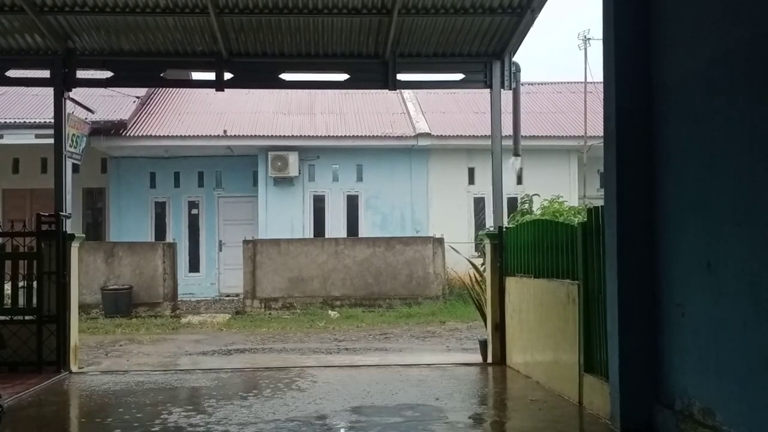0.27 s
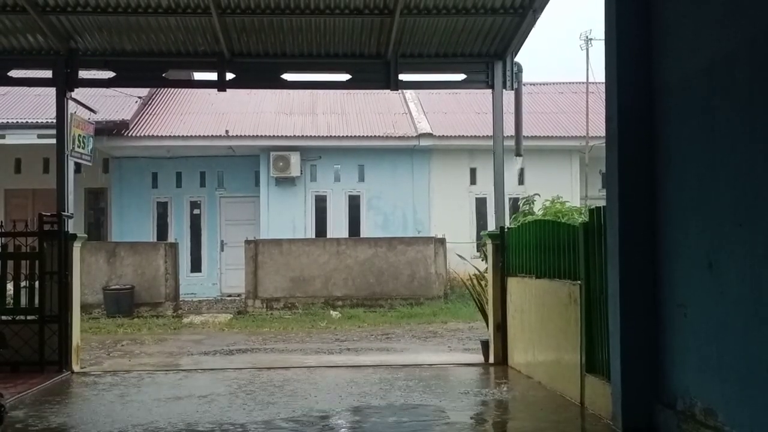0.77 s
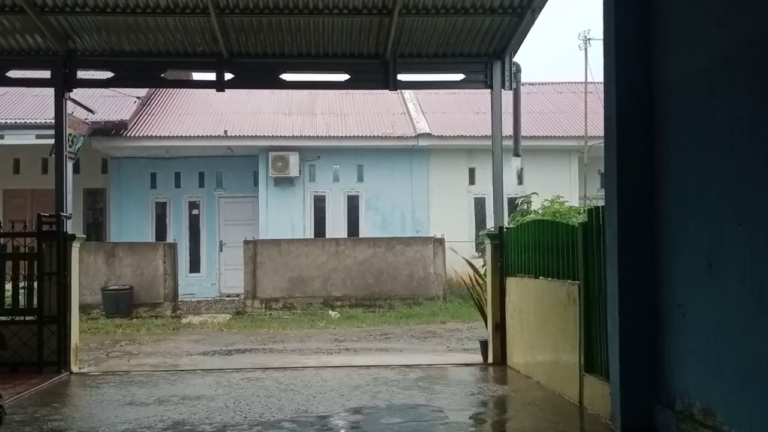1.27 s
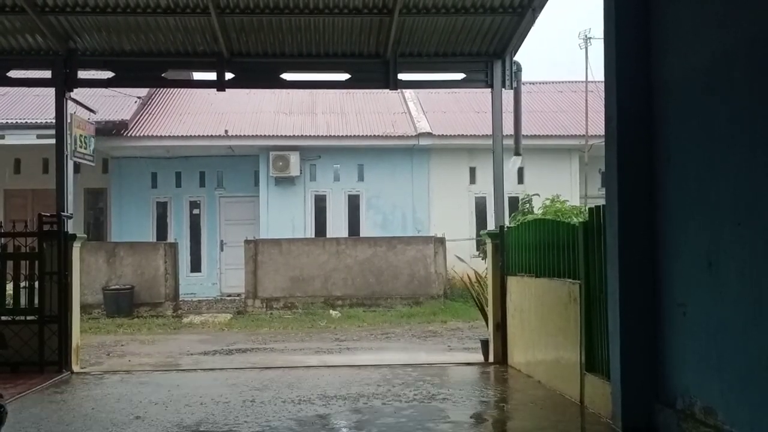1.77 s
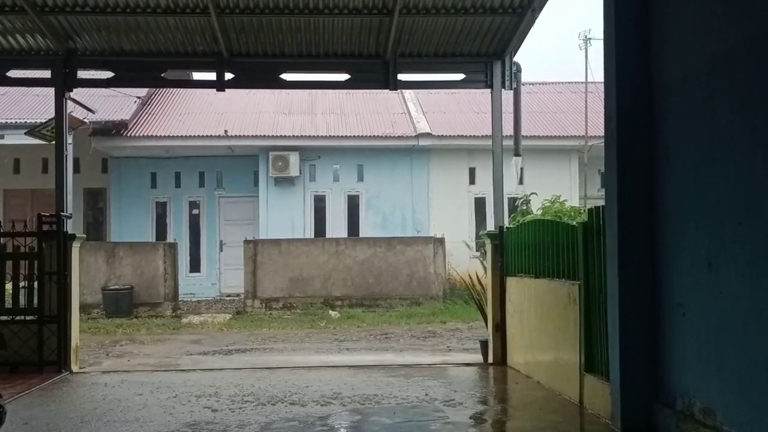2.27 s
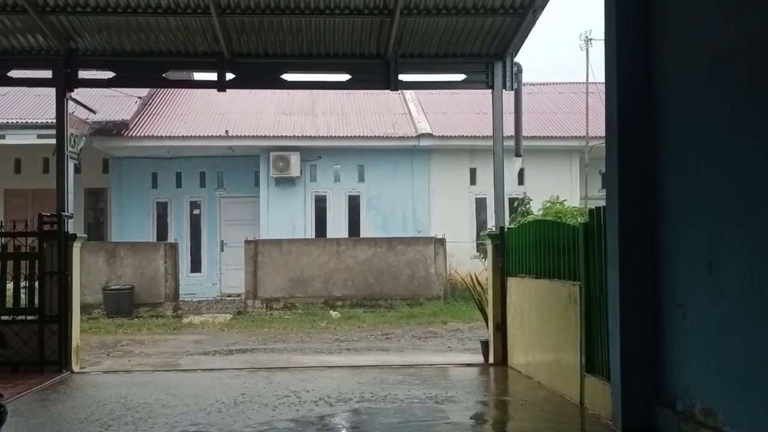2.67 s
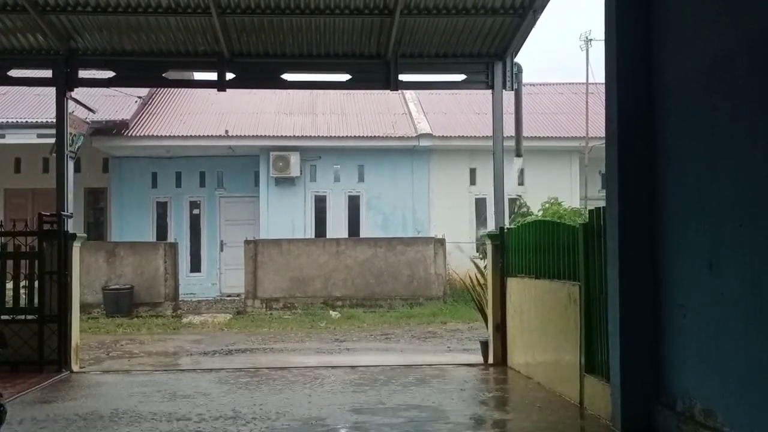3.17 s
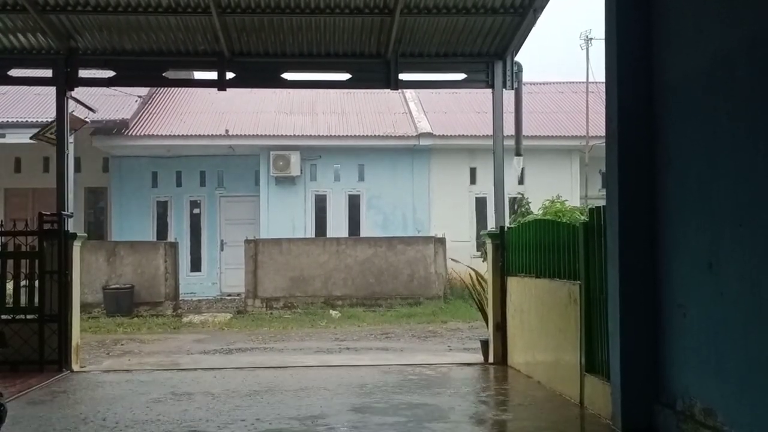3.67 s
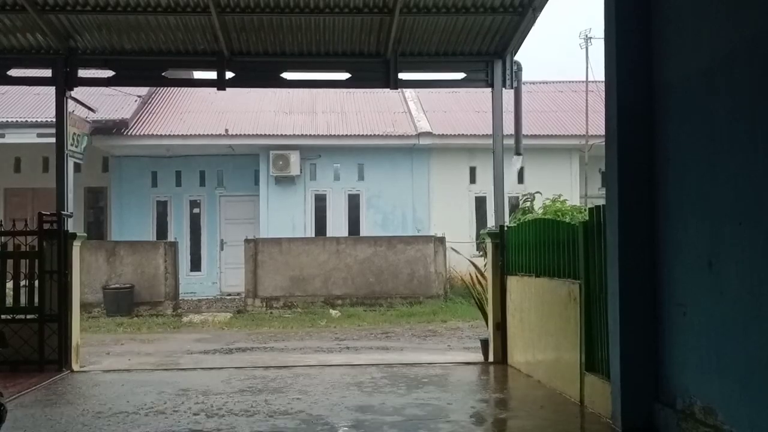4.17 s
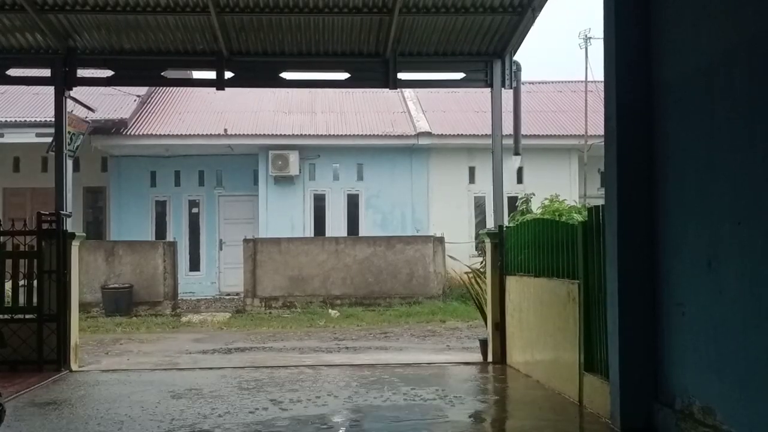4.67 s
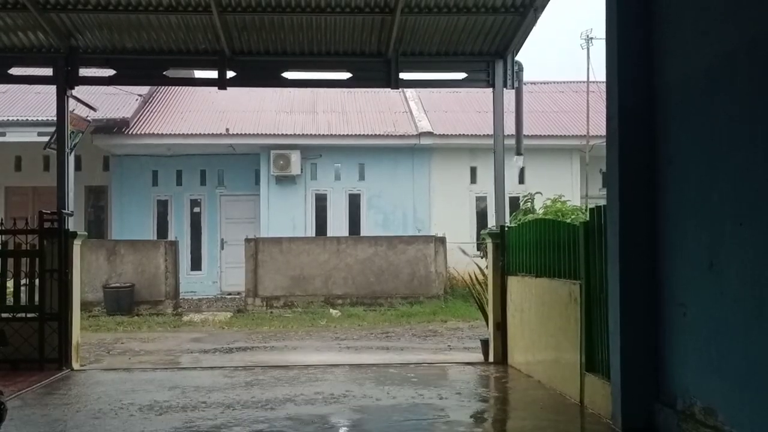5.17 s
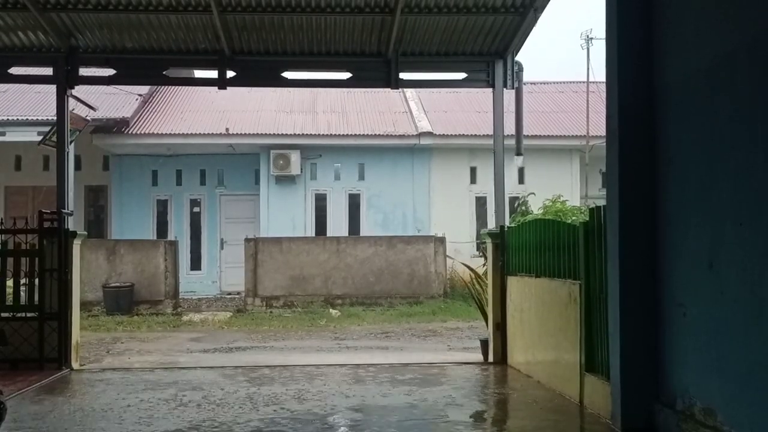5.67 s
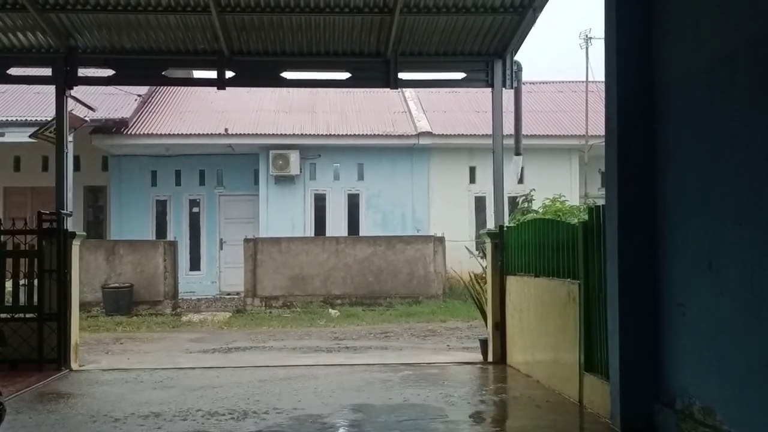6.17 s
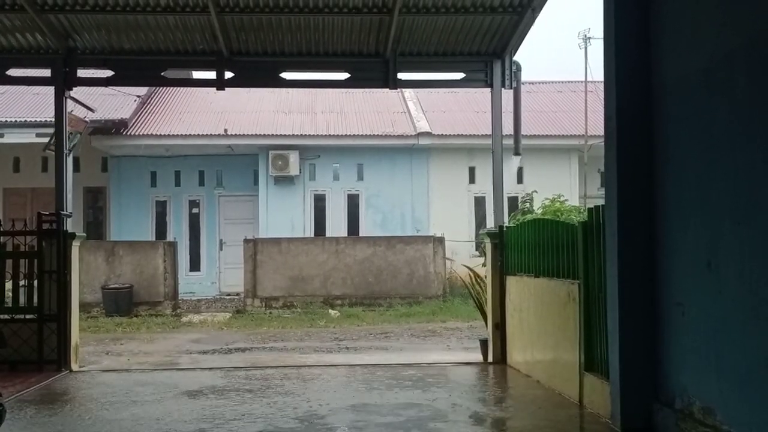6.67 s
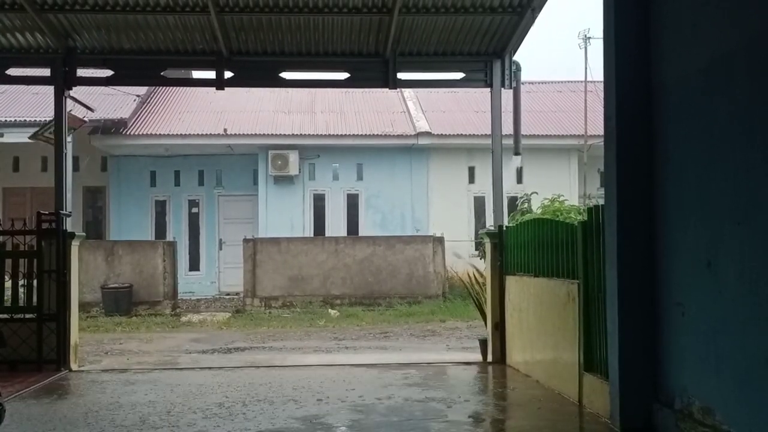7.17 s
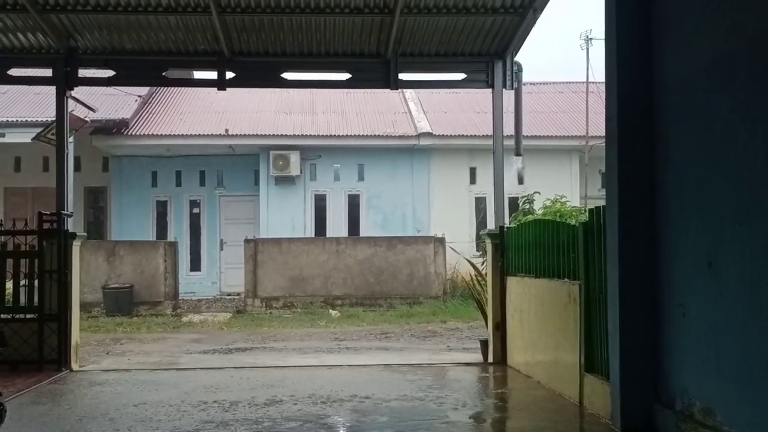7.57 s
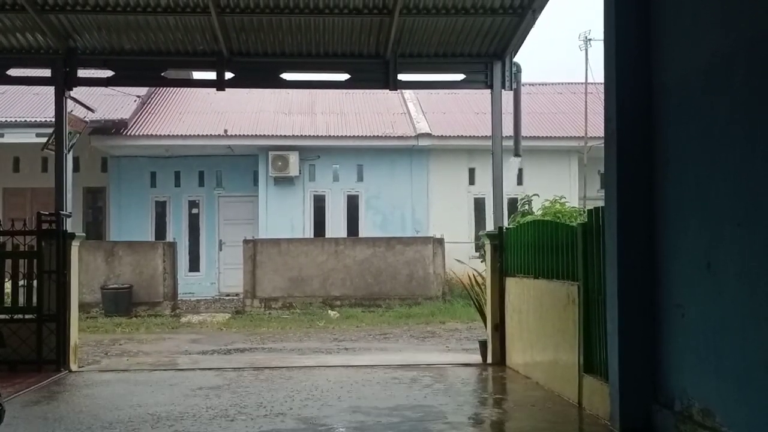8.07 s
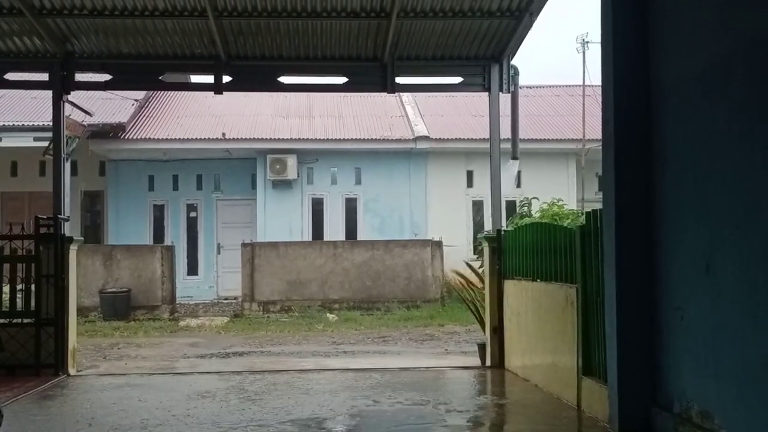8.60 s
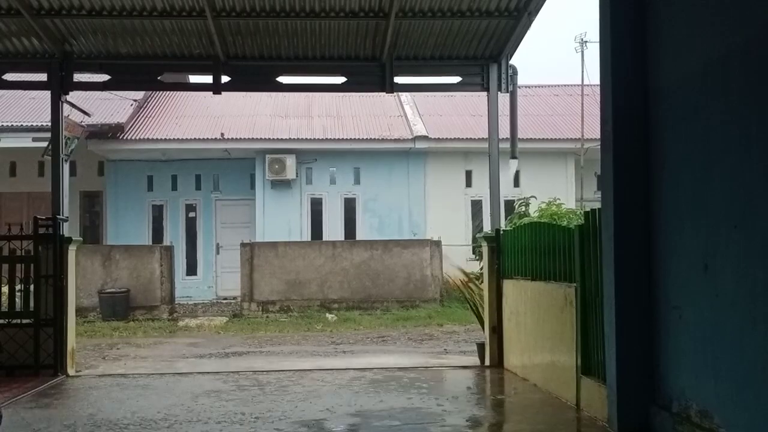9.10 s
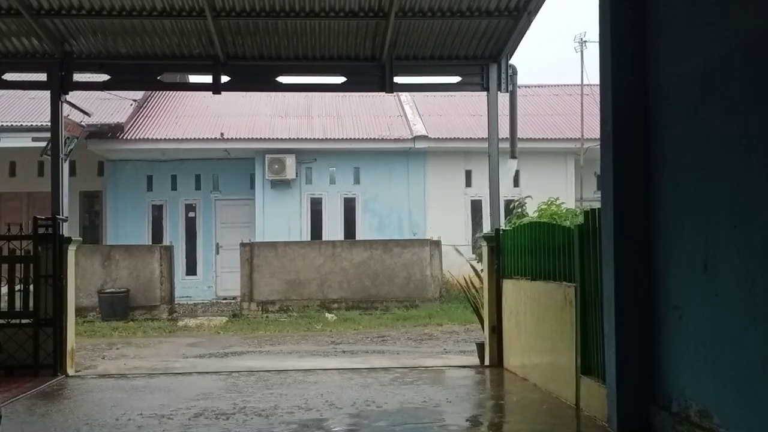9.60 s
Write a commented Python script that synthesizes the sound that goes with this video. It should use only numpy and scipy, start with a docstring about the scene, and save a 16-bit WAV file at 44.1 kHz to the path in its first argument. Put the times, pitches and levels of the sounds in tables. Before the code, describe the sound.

A heavy downpour is already roaring at the start and continues without pause for nearly ten seconds, heard in mono from beneath a corrugated metal carport. Dense hard ticks on thin metal, brightest near 3 kHz, merge with a fine sizzle of spray and a smoother, duller rush from distant roofs. Underneath, panels drum dully and the roof span booms softly around 100 Hz, swaying irregularly. Gusts brighten and lift the roar at about 0, 0.7 and 1.6 seconds, then 3.1 to 3.5 and 4.4 to 4.8. The biggest surge crests near 5.7 and falls away gradually; milder swells follow around 7.1, 8.1, 8.9 and 9.5. The boom is fuller early and thinner after 6 seconds, recovering toward the end. Single fat drops crack close by with short, tight echoes near 1.2, 2.5, 3.8, 4.3, 5.3, 5.9, 6.1, 7.3 and 9.6. The rain is still pouring at the end.

```python
"""A bright roar of rain at the crest of a gust: a downpour on corrugated metal roofs, in mono from under a carport.
Thousands of random clicks a second, coloured by filters, make the patter, the panels' drumming and the spray.
Filtered noise makes the smooth rush of far roofs and, through resonators, the boom of the roof span.
Gusts throw sheets of rain over the roofs, so that the roar swells and brightens.
Now and then a fat drop ticks out of the wash and echoes under the carport."""
import sys
import numpy as np
from scipy import signal
from scipy.fft import rfft, irfft, next_fast_len
from scipy.io import wavfile

SR = 44100
rng = np.random.default_rng(int(sys.argv[2]) if len(sys.argv) > 2 else 0)


def log_audio(samples):
    """Write samples as a 16-bit WAV file to the path given in sys.argv[1]."""
    # one column per channel
    frames = np.atleast_2d(samples).T
    # limit to full scale, then quantise
    limited = np.clip(frames, -1, 1)
    pcm = np.round(limited * 32767).astype(np.int16)
    wavfile.write(sys.argv[1], SR, pcm)


N = 433944


def from_db(db):
    """Decibels to gain."""
    return 10 ** (np.asarray(db) / 20)


def rms_one(x):
    """Scale to rms 1."""
    return x / np.sqrt(np.mean(x ** 2) + 1e-20)


def level_curve(table):
    """Draw straight lines through a table of times and levels, one value per sample."""
    times_s, levels_db = np.transpose(table)
    return np.interp(np.arange(N) / SR, times_s, levels_db)


def band(x, low_hz, high_hz, order=4):
    """Butterworth band-pass."""
    sections = signal.butter(order, [low_hz, high_hz], "band", fs=SR, output="sos")
    return signal.sosfilt(sections, x)


def coloured(x, spectrum):
    """Causal (minimum-phase) filter of a given spectrum: each click becomes a short ring."""
    size = 2 * next_fast_len(N // 2 + SR // 4)
    hz, db = np.transpose(spectrum)
    bins_hz = np.maximum(np.arange(size // 2 + 1) * SR / size, 1)
    gain = from_db(np.interp(np.log(bins_hz), np.log(hz), db))
    # folding the cepstrum onto positive times puts the energy as early as it can be
    cepstrum = irfft(np.log(gain))
    cepstrum[1:size // 2] *= 2
    cepstrum[size // 2 + 1:] = 0
    response = np.exp(rfft(cepstrum))
    return irfft(rfft(x, size) * response)[:N]


def drift(rate_hz):
    """Slow random wander of rms 1: noise through two equal one-pole low-passes."""
    step = 100   # samples between the points of the wander
    r = np.exp(-2 * np.pi * rate_hz * step / SR)
    noise = rng.standard_normal(2 * (N // step))
    slow = signal.lfilter([1], [1, -2 * r, r * r], noise)[N // step:]   # the first half settles the filter
    return np.interp(np.arange(N) / step, np.arange(len(slow)), rms_one(slow))


def drops(per_s, level_db, spread_db):
    """Random impacts of uneven size and even overall power; the harder it rains, the more of them land."""
    flow = from_db(level_db - np.mean(level_db)) ** 2
    chance = per_s * flow / SR
    landed = rng.random(N) < chance
    sizes = from_db(spread_db * np.minimum(rng.exponential(1, N), 4)) * rng.choice([-1, 1], N)
    # dividing by the density leaves the loudness to the layer's own level
    return rms_one(landed * sizes / np.sqrt(np.minimum(chance, 1)))


GUST_FALL = 1.77   # a gust takes this many times longer to die away than to rise
FLURRY_DB, FLURRY_HZ = 0.16, 9.9   # small random surges: depth and rate
# Gusts throwing sheets of rain over the roofs; each layer takes its own share of the swell.
# Each row: crest in seconds, swell in dB, rise time in seconds (from 1/e of the swell to the crest).
GUST_CRESTS = [(0, 3.5, .24), (.66, 5.5, .19), (1.63, 5, .56), (3.06, 3.5, .23), (3.5, 4.5, .44),
               (4.429, 3.5, .17), (4.77, 3.5, .11), (5.749, 9, .39), (6.43, 2.5, .16), (7.1, 3.5, .42),
               (8.1, 3, .24), (8.89, 3.5, .18), (9.52, 3, .25)]


def gust_swell():
    """Rain intensity in dB: each gust rises quickly and dies away more slowly, with flurries on top."""
    t = np.arange(N) / SR
    swell_db = FLURRY_DB * drift(FLURRY_HZ)
    for crest_s, db, rise_s in GUST_CRESTS:
        width_s = np.where(t < crest_s, rise_s, rise_s * GUST_FALL)
        swell_db = swell_db + db * np.exp(-((t - crest_s) / width_s) ** 2)
    return swell_db


# base level in dB, share of the gusts' swell, share of the low end's slow level
PATTER_DB, PATTER_GUST, PATTER_LOW = -24.5, .9, .15
# Colour of a tick on thin metal, before any band-pass. Each row: frequency in Hz, level in dB per Hz.
PATTER_COLOUR = [(260, -40), (450, -14), (821, -7), (1580, -5.5), (3240, 0), (3630, -2.5), (4780, -21),
                 (5600, -28), (7280, -49), (12300, -120)]


def metal_patter(swell_db, low_db):
    """Each drop gives the thin metal overhead a hard tick, brightest near 3 kHz."""
    level_db = PATTER_DB + PATTER_GUST * swell_db + PATTER_LOW * low_db
    ticks = coloured(drops(16000, level_db, spread_db=2.0), PATTER_COLOUR)
    near = band(ticks, low_hz=590, high_hz=4950, order=6)
    # small drops are too light to move the sheet at low pitch
    near = band(near, low_hz=850, high_hz=18000, order=1)
    return from_db(level_db) * rms_one(near)


# base level in dB, share of the gusts' swell, share of the low end's slow level
FAR_DB, FAR_GUST, FAR_LOW = -33.5, 0.45, 1.8
# Colour of the far roofs, dulled by distance. Each row: frequency in Hz, level in dB per Hz.
FAR_COLOUR = [(100, -67), (350, -25), (600, -5), (850, 0.5), (1050, -5), (1500, -3.5), (2200, -1),
              (4000, -27), (7000, -43)]


def far_roofs(swell_db, low_db):
    """So many distant drops arrive at once that they make a smooth rush, played as coloured noise."""
    level_db = FAR_DB + FAR_GUST * swell_db + FAR_LOW * low_db
    rush = coloured(rng.standard_normal(N), FAR_COLOUR)
    return from_db(level_db) * rms_one(rush)


# base level in dB, share of the gusts' swell, share of the low end's slow level
DRUM_DB, DRUM_GUST, DRUM_LOW = -40.5, .5, 1.3
# Colour of the panels' drumming, before the band-pass. Each row: frequency in Hz, level in dB per Hz.
DRUM_COLOUR = [(59, -34), (100, -11.5), (258, -4.5), (482, -7), (900, 2), (1170, -38), (1980, -120)]


def panel_drumming(swell_db, low_db):
    """Heavy drops thud on the sheets; their dull rings overlap."""
    level_db = DRUM_DB + DRUM_GUST * swell_db + DRUM_LOW * low_db
    thuds = coloured(drops(5000, level_db, spread_db=1.1), DRUM_COLOUR)
    return from_db(level_db) * rms_one(band(thuds, low_hz=146, high_hz=613, order=6))


BOOM_GUST = 0.35   # share of the gusts' swell
BOOM_SWAY_DB, BOOM_SWAY_HZ = 2, 5   # the boom swells and sinks at random: depth and rate
# Lowest bending modes of the roof span, each resonator run twice.
# Each row: frequency in Hz, width of one pass in Hz, gain in dB against the other modes.
BENDING_MODES = [(44, 26, -16), (63, 16, -12), (92.6, 10, 0.5), (103.3, 15, 1), (130, 25, -1.5)]
# Slow level of the boom, before gusts and sway. Each row: time in seconds, level in dB.
BOOM_LEVEL = [(0, -54.5), (1.7, -52), (3.4, -52), (4.0, -56), (5.6, -53.3), (6.3, -57.5), (7.7, -57),
              (9.84, -53.5)]


def roof_boom(swell_db):
    """The load of the rain, a random push, keeps the span's lowest modes swaying."""
    boom = 0
    pushes = rng.standard_normal((len(BENDING_MODES), N + SR))   # one extra second to get the modes going
    for (hz, width_hz, db), push in zip(BENDING_MODES, pushes):
        b, a = signal.iirpeak(hz, hz / width_hz, fs=SR)
        ringing = signal.lfilter(b, a, signal.lfilter(b, a, push))
        boom = boom + from_db(db) * ringing
    # an open roof radiates almost nothing in the deepest bass
    radiated = band(boom, low_hz=27, high_hz=400)[SR:]
    level_db = level_curve(BOOM_LEVEL) + BOOM_GUST * swell_db + BOOM_SWAY_DB * drift(BOOM_SWAY_HZ)
    return from_db(level_db) * rms_one(radiated)


RUNOFF_S = 1.0   # lag of the water pouring off the eaves


def runoff(swell_db):
    """The roofs drain slowly, so their overflow trails behind the gusts: a one-pole lag."""
    keep = np.exp(-1 / (RUNOFF_S * SR))
    return signal.lfilter([1 - keep], [1, -keep], swell_db)


# base level in dB, share of the gusts' swell, share of the low end's slow level (negative: against it)
SPRAY_DB, SPRAY_GUST, SPRAY_LOW = -38.5, 1.09, -.25
RUNOFF_SHARE = 0.21   # share of the lagging swell, which prolongs the spray after a gust
# Colour of the spray, before the band-pass. Each row: frequency in Hz, level in dB per Hz.
SPRAY_COLOUR = [(2470, -27), (4200, -5), (5030, -8.5), (6590, -1.5), (8430, -10.5), (11000, -9.5),
                (12700, -13.5), (15600, -22)]


def spray(swell_db, low_db):
    """Drops shatter on metal, concrete and puddles into a fine sizzle."""
    level_db = SPRAY_DB + SPRAY_GUST * swell_db + SPRAY_LOW * low_db + RUNOFF_SHARE * runoff(swell_db)
    sizzle = coloured(drops(22000, level_db, spread_db=2.0), SPRAY_COLOUR)
    return from_db(level_db) * rms_one(band(sizzle, low_hz=4700, high_hz=19000, order=6))


# Reflections from floor, wall and roof of the carport.
# Each row: delay in seconds, level in dB against the direct sound.
REFLECTIONS = [(.0067, -4), (.0131, -4), (.0223, -2), (.0371, -20)]


def carport(x):
    """Hard surfaces return each impact a few times, smeared over 10 ms by the corrugations."""
    response = np.zeros(SR // 10)
    response[0] = 1
    smear = np.arange(SR // 100)
    for delay_s, db in REFLECTIONS:
        scatter = rng.standard_normal(len(smear)) * np.exp(-4 * smear / len(smear))
        at = int(delay_s * SR)
        response[at:at + len(smear)] += from_db(db) * scatter / np.linalg.norm(scatter)
    return signal.fftconvolve(x, response)[:N]


# Fat drops close by. Each row: impact in seconds, peak in dB before the band-pass and the echoes.
CLOSE_DROPS = [(1.234, -7), (2.51, -14), (3.792, -13), (4.344, -10), (5.273, -14), (5.87, -8), (6.078, -8),
               (7.267, -12), (9.594, -7)]


def fat_drops():
    """Single big drops crack on the nearest sheet, with the patter's colour, and echo under the roof."""
    clicks = np.zeros(N)
    for impact_s, db in CLOSE_DROPS:
        clicks[round(impact_s * SR)] = from_db(db)
    unit_peak = np.abs(coloured(signal.unit_impulse(N), PATTER_COLOUR)).max()
    cracks = coloured(clicks, PATTER_COLOUR) / unit_peak
    return carport(band(cracks, low_hz=400, high_hz=16000, order=2))


# Slow level of the low end of the roar; each layer takes its own share.
# Each row: time in seconds, level in dB.
LOW_END_LEVEL = [(0.0, 1.5), (0.9, 1), (2.7, -0.3), (3.7, 0.7), (4.9, -0.5), (5.5, 0.33), (6.9, -0.1),
                 (7.7, -1.5), (8.55, -1.73), (8.9, -0.5), (9.84, 0.7)]


def scene():
    """The gusts drive all the steady layers, the bright ones most; both channels carry the same sum."""
    swell_db = gust_swell()
    low_db = level_curve(LOW_END_LEVEL)
    rain = (metal_patter(swell_db, low_db)
            + far_roofs(swell_db, low_db)
            + panel_drumming(swell_db, low_db)
            + roof_boom(swell_db)
            + spray(swell_db, low_db)
            + fat_drops())
    return np.stack([rain, rain])


def record(dry):
    """A steep elliptic low-pass cuts off the top treble."""
    # 0.1 dB ripple below the 15.75 kHz edge, 90 dB down above
    steep = signal.ellip(12, .1, 90, 15750, fs=SR, output="sos")
    return signal.sosfilt(steep, dry)


dry = scene()
out = record(dry)
log_audio(out)
```